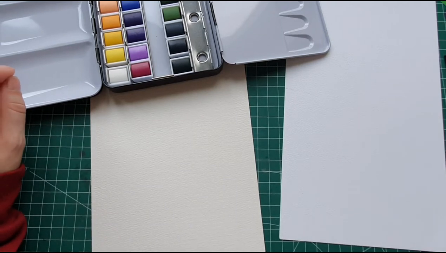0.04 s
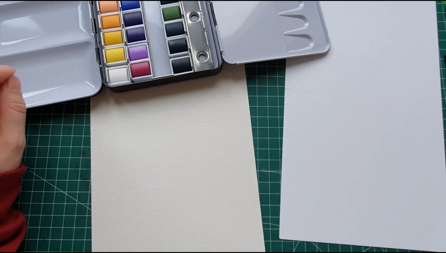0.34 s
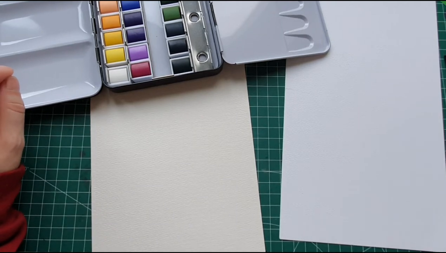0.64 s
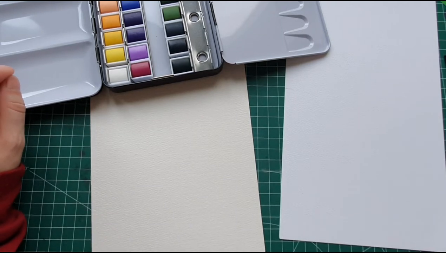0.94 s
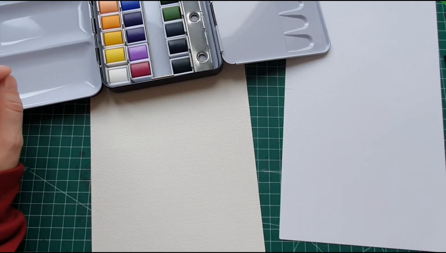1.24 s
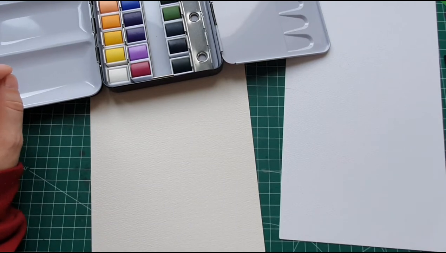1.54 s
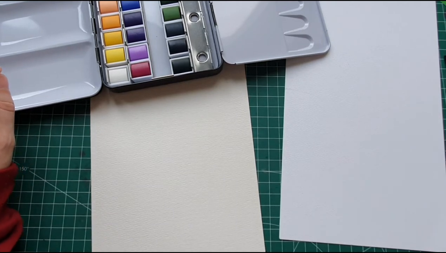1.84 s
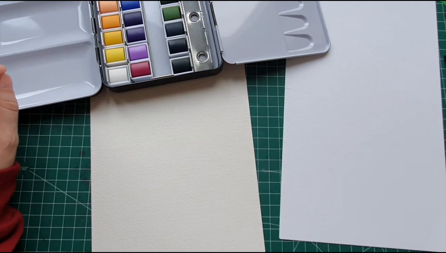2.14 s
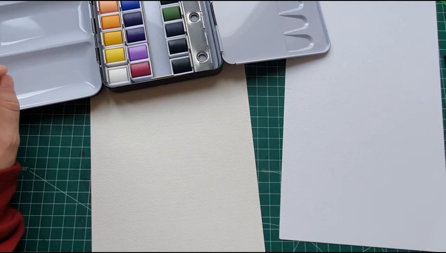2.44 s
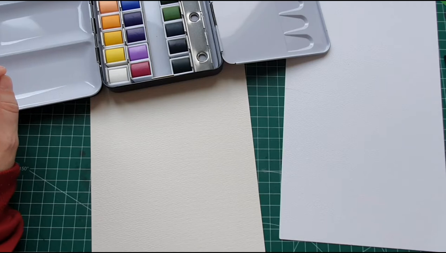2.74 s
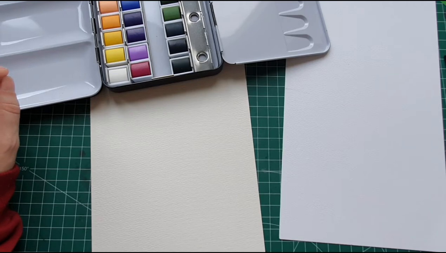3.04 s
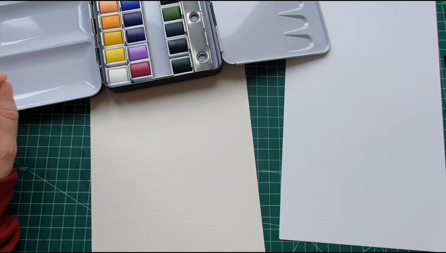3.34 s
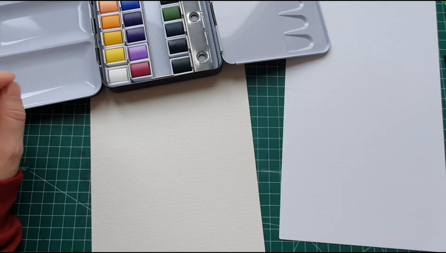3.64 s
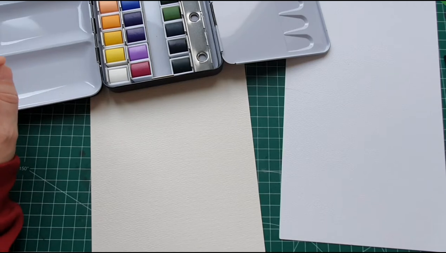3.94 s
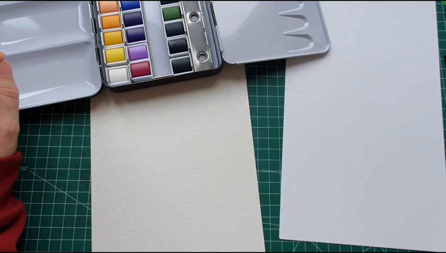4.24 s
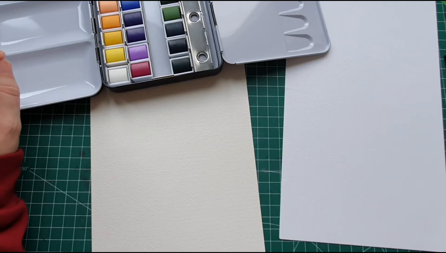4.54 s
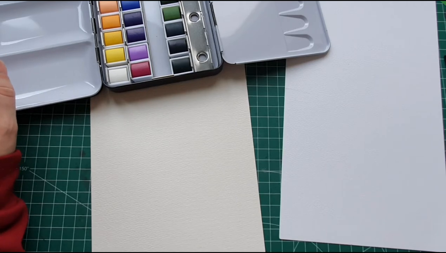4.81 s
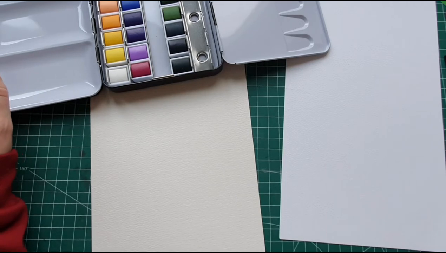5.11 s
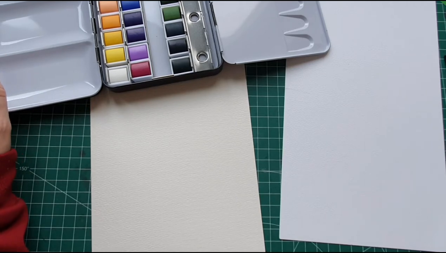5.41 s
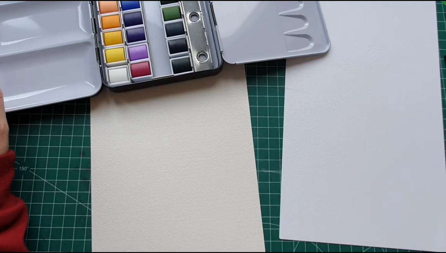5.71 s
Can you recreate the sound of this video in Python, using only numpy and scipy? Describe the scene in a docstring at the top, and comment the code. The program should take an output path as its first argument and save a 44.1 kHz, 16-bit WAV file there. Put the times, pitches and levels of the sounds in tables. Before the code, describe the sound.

Light, irregular clicks and rubs come from wooden paintbrushes being sorted on a tabletop, slightly to the right of the microphone. Sharper clusters of clacks follow, mixed with rustling bristles and dull bumps of the hand on the table, before the sounds ease into sparse, gentle ticks. Behind them the small room holds steady room tone and a faint engine-like hum that drifts in pitch.

```python
"""A small room, with a table to the right of a stereo microphone: a hand picks through wooden paintbrushes.
Handles knock on the tabletop, clack together and slide over one another; metal ferrules tick,
bristles hiss, and now and then the hand bumps the table softly. Underneath lie a low hum of
drifting pitch, like an engine far outside, a low resonance of the room and steady room tone."""
import sys
import numpy as np
from scipy import signal
from scipy.fft import rfft, irfft, next_fast_len
from scipy.io import wavfile
from scipy.ndimage import map_coordinates

SR = 44100
rng = np.random.default_rng(int(sys.argv[2]) if len(sys.argv) > 2 else 0)


def to_wav(sig):
    """Store sig (one row per channel, or 1-D mono) as 16-bit WAV at the path in sys.argv[1].

    Samples outside -1..1 are clipped; the rate is SR.
    """
    pcm = np.clip(np.atleast_2d(sig), -1, 1) * 32767
    pcm = np.round(pcm).astype(np.int16)
    wavfile.write(sys.argv[1], SR, pcm.T)  # frames by channels


N = 263321

# brush contacts: start_s, knock_db, clack_db, tick_db, knock_centre_hz, clack_centre_hz
CONTACTS = [(0.3649, -39, -45.5, -68, 390, 3340), (0.4982, -40, -48.5, -65.5, 390, 1330),
            (0.5184, -37.5, -56, -57.5, 406, 3070), (0.5432, -39.5, -41, -52, 600, 1450),
            (0.9283, -29.5, -37.5, -39, 470, 1960), (0.9437, -32, -46, -53.5, 390, 2930),
            (1.033, -34, -44.5, -58.5, 380, 1265), (1.2417, -38, -60, -58.5, 364, 1270),
            (1.4269, -42.5, -39, -53.5, 520, 1810), (1.44, -48, -39, -54.5, 527, 1810),
            (1.5313, -42, -52, -63.5, 407, 1546), (1.6375, -30, -44, -51.5, 365, 1690),
            (1.788, -35, -40.5, -59.5, 830, 1212), (1.7978, -36, -52, -67.5, 555, 1190),
            (2.0073, -47.5, -38.5, -52, 330, 2560), (2.1741, -27, -30.5, -53.5, 609, 1264),
            (2.191, -28, -33.5, -48.5, 450, 1355), (2.305, -36, -31, -36.5, 533, 4400),
            (2.39, -18.5, -23, -34, 603, 1300), (2.4383, -27, -19, -41.5, 477, 2600),
            (2.4546, -19.5, -24, -33, 459, 1950), (2.9872, -46.5, -29.5, -43, 619, 2806),
            (3.025, -29, -27.5, -45, 606, 2600), (3.0805, -36, -33, -44, 630, 2870),
            (3.1139, -43.5, -61, -50, 406, 1810), (3.1943, -50, -48, -52.5, 593, 2080),
            (3.346, -24.5, -23.5, -35, 605, 2660), (3.3654, -34, -31.5, -46, 621, 2790),
            (3.4422, -42.5, -35, -45.5, 605, 2130), (4.1094, -29, -26, -36, 730, 5000),
            (4.1204, -36.5, -29.5, -40.5, 615, 2724), (4.194, -30.5, -30.5, -47.5, 785, 2440),
            (4.2436, -37, -34, -49, 660, 3406), (4.3216, -39.5, -41, -54, 536, 2870),
            (5.2744, -39, -51.5, -72.5, 580, 1798), (5.3118, -42, -50, -59.5, 417, 1830),
            (5.3519, -42.5, -53, -63, 510, 1860), (5.6277, -38, -42, -42, 800, 1784),
            (5.8346, -42, -60, -63.5, 398.3, 1340), (5.874, -41, -51.5, -66, 412.4, 1260),
            (5.904, -50, -53, -55, 425, 1962), (5.9336, -36.5, -45.5, -50, 333, 1296)]
# light taps of one slim handle: start_s, level_db
SLIM_TAPS = [(4.8595, -52), (4.9213, -42.5), (4.9374, -44), (5.135, -57), (5.1675, -60), (5.2111, -46.5)]
# soft bumps on the table: start_s, peak_db, pitch_hz, t60_s
TABLE_BUMPS = [(0.934, -27.5, 232.5, 0.27), (1.782, -29.5, 118.5, 0.14), (1.989, -29, 62, 0.13),
               (2.302, -24, 202, 0.16), (2.39, -21, 251.6, 0.16), (2.456, -23.5, 116, 0.3),
               (2.459, -26, 186, 0.2), (3.237, -41.5, 108.3, 0.13), (3.319, -27, 100, 0.13),
               (3.937, -28, 227.6, 0.11), (4.113, -20, 151.4, 0.23), (4.182, -19, 189, 0.07),
               (4.198, -18, 82.4, 0.12), (4.86, -29.5, 217, 0.12), (5.283, -32.5, 163, 0.13),
               (5.507, -36.5, 253, 0.1)]
# strokes of the hand through the brushes: start_s, length_s, rub_db, scuff_db, hiss_db
HAND_STROKES = [(0.354, 0.076, -45, -47.5, -61), (0.503, 0.056, -44, -39.5, -57),
                (0.6, 0.14, -56, -46, -63.5), (0.792, 0.15, -53, -41.5, -61), (0.894, 0.056, -34, -36, -44),
                (0.97, 0.21, -74, -64, -72.5), (1.217, 0.095, -47.5, -45.5, -52),
                (1.292, 0.067, -44, -40.5, -60), (1.408, 0.061, -39, -42.5, -55),
                (1.45, 0.14, -53, -47.5, -62), (1.611, .06, -44, -49, -57.5),
                (1.719, 0.093, -40.5, -40.5, -50), (1.902, 0.21, -39, -42, -44),
                (2.066, .18, -32, -41, -39.5), (2.288, 0.075, -30, -30, -36),
                (2.432, 0.077, -30.5, -25, -47), (2.86, 0.08, -38, -45, -50), (2.995, .11, -35, -34, -51),
                (3.2, 0.25, -45.5, -54, -49.5), (3.32, 0.12, -39, -38, -48.5),
                (3.52, 0.38, -59.5, -87, -58), (3.734, 0.071, -52.5, -79, -54.5),
                (3.915, 0.069, -67, -52, -69.5), (4.06, 0.12, -52.5, -63, -53),
                (4.12, 0.094, -34, -33.5, -38), (4.201, .12, -31.5, -45, -43.5),
                (4.845, 0.1, -53, -53.5, -67), (5.136, 0.12, -52, -57, -62),
                (5.265, 0.096, -65, -50.5, -57), (5.411, 0.29, -81.5, -55.5, -79),
                (5.617, .04, -49, -48, -59), (5.878, 0.071, -48.5, -48, -53)]
# course of the distant engine: time_s, firing_hz, level_db
ENGINE_COURSE = [(0, 50.4, -45), (.42, 50.2, -39.5), (.8, 51.57, -45.5), (1, 51.86, -40),
                 (1.25, 53.07, -50), (2.35, 55.65, -40.5), (2.75, 55.5, -73), (3.25, 51.7, -42.5),
                 (3.52, 47.1, -44), (3.76, 44, -59), (3.95, 43.5, -43.5), (4.33, 47.16, -42),
                 (4.6, 49.9, -47), (4.92, 49.67, -41.5), (5.3, 51.4, -50), (5.6, 55.7, -43.5),
                 (5.97, 57.1, -47)]
# its harmonics as heard indoors: multiple, gain_db
ENGINE_HARMONICS = [(1, 2), (2, -6.5), (3, -7), (4, -15.5), (5, -26)]
# resonances of the struck bodies: centre_hz, width_hz, gain_db
TABLETOP_MODES = [(309, 140, -1.5), (392.3, 61, 1.5), (509, 120, -0.5), (574.5, 84, 3), (638, 40, 3.5),
                  (710.4, 17, 5.5), (907, 153, 3)]
HANDLE_MODES = [(1354, 160, 2.5), (1770, 110, -1), (1895, 120, 1.5), (2640, 250, 0.5), (3170, 1000, -2),
                (4030, 820, -1), (4570, 350, -4), (5500, 570, -8.5)]
FERRULE_MODES = [(6000, 680, 2.5), (8470, 1200, 3.5), (10200, 1400, 3), (11600, 1900, 0),
                 (14300, 4500, -11.5)]
SLIM_HANDLE_MODES = [(734, 139, -1.5), (1010, 200, -1.5), (1490, 160, 4), (1890, 100, 1), (2180, 100, -1),
                     (2910, 150, 2.5), (3570, 220, -2), (5590, 1800, -18)]
# spectra of the noisy sounds: frequency_hz, gain_db
CRACK_SPECTRUM = [(600, -5.5), (1900, -4.5), (4500, 5.5), (6000, -3.5), (12000, -21), (16000, -20)]
RUB_SPECTRUM = [(400, -36), (900, -1), (1400, 5), (2000, 4.5), (2700, 5.5), (4300, 3), (5500, -13.5),
                (7500, -30), (14000, -59.5)]
BRISTLE_SPECTRUM = [(2940, -27), (5000, 1.5), (7640, -6), (8580, -2), (10000, -6), (11800, -7.5),
                    (15200, -12), (16000, -41.5)]
ROOM_TONE_SPECTRUM = [(20, -19.5), (50, -10.5), (160, -14.5), (250, -24), (340, -28.5), (430, -40.5),
                      (1000, -44), (1400, -40), (2000, -52.5), (3300, -55), (7000, -64), (16000, -63)]
THUD_SPECTRUM = [(30, -18), (55, -10.5), (80, 8.5), (250, 2.5), (450, -27), (900, -18.5), (2000, -63.5)]
# reverberation of the room: frequency_hz, t60_s
ROOM_DECAY = [(100, 0.41), (500, 0.36), (3000, 0.31), (8000, 0.27), (15000, .22)]

TIME_S = np.arange(N) / SR
BLOW_S = np.arange(SR // 3) / SR  # time within one blow


def brush_contacts():
    """Right of the microphone, each contact knocks the tabletop and rings a handle and its ferrule."""
    out = np.zeros((2, N))
    for start_s, knock_db, clack_db, tick_db, knock_hz, clack_hz in CONTACTS:
        # the point of contact favours the resonances around one frequency
        knock = lambda hz: body(TABLETOP_MODES, hz) * resonance(hz, knock_hz, rel_width=0.22)
        clack = lambda hz: body(HANDLE_MODES, hz) * resonance(hz, clack_hz, rel_width=1.5)
        tick = lambda hz: body(FERRULE_MODES, hz)
        add(out, start_s, strike(knock, knock_db, chatter_s=0.013, snap=16, wet_db=-3, right_db=-0.5))
        add(out, start_s, strike(clack, clack_db, chatter_s=0.023, snap=2.8, wet_db=2, right_db=8))
        add(out, start_s, strike(tick, tick_db, chatter_s=0.055, snap=5.2, wet_db=3.5, right_db=19))
        add(out, start_s, crack(tick_db))
    return out


def crack(tick_db, hard_tick_db=-33.5, db_per_tick_db=4.1):
    """Hard blows open with a sharp crack, which grows faster than their ring."""
    burst = rng.standard_normal(len(BLOW_S)) * decay(t60_s=0.006)
    sound = in_room(filtered(burst, spectrum(CRACK_SPECTRUM)), wet_db=0.5, right_db=5)
    peak_db = -1.5 + db_per_tick_db * (tick_db - hard_tick_db)
    return amp(peak_db) * sound / np.abs(sound).max()


def slim_handle_taps():
    """A slim handle ticks on its own, hollow and clear of the tabletop."""
    out = np.zeros((2, N))
    handle = lambda hz: body(SLIM_HANDLE_MODES, hz)
    for start_s, level_db in SLIM_TAPS:
        add(out, start_s, strike(handle, level_db, chatter_s=0.015, snap=7.82, wet_db=-0.5, right_db=12))
    return out


def table_bumps():
    """The hand and the brush bundle push the table: a dull, quickly damped low note."""
    out = np.zeros((2, N))
    for start_s, peak_db, pitch_hz, t60_s in TABLE_BUMPS:
        thud = unit_rms(filtered(rng.standard_normal(len(BLOW_S)), spectrum(THUD_SPECTRUM)))
        note = np.sin(2 * np.pi * pitch_hz * BLOW_S)
        envelope = decay(t60_s) * (1 - np.exp(-BLOW_S / 0.0054))
        sound = in_room((note + 0.99 * thud) * envelope, wet_db=-6.5, right_db=4)
        add(out, start_s, amp(peak_db) * sound / np.abs(sound).max())
    return out


def sliding_brushes():
    """Handles rub together and scuff the tabletop while bristles hiss; strokes add in power."""
    power = np.zeros((3, N))
    for start_s, length_s, *levels_db in HAND_STROKES:
        power += np.outer(amp(levels_db) ** 2, hand_stroke(start_s, length_s) ** 2)
    rub_gain, scuff_gain, hiss_gain = np.sqrt(power)
    wood = lambda hz: amp(along(RUB_SPECTRUM, hz)) * (1 + 0.25 * body(HANDLE_MODES, hz))
    bristles = spectrum(BRISTLE_SPECTRUM)
    rub = friction(wood, catches_per_s=530, smooth=0.45, flutter_db=4, wet_db=9, right_db=2)
    hiss = friction(bristles, catches_per_s=300, smooth=0.41, flutter_db=1.5, wet_db=7, right_db=7.5)
    return rub_gain * rub + tabletop_scuff(scuff_gain) + hiss_gain * hiss


def hand_stroke(start_s, length_s, attack_share=0.39, release_db_per_s=272.5, settle_db_per_s=101):
    """A stroke's strength: the hand takes hold, pushes on, then leaves the brushes faintly settling."""
    t = TIME_S - start_s
    attack = np.sin(np.pi / 2 * np.clip(t / (attack_share * length_s), 0, 1)) ** 2
    after_s = np.maximum(t - length_s, 0)
    release = amp(-release_db_per_s * after_s)
    settling = amp(-17 - settle_db_per_s * after_s)
    return attack * np.maximum(release, settling)


def tabletop_scuff(strength, even_mix_db=-33):
    """Handles drag on the tabletop: light drags hum low, hard ones wake higher resonances."""
    low = lambda hz: body(TABLETOP_MODES, hz) * resonance(hz, 407, rel_width=0.32)
    high = lambda hz: body(TABLETOP_MODES, hz) * resonance(hz, 560, rel_width=0.6)
    light = friction(low, catches_per_s=170, smooth=0.7, flutter_db=1.5, wet_db=-4, right_db=4.5)
    hard = friction(high, catches_per_s=360, smooth=0.57, flutter_db=5.5, wet_db=-9.5, right_db=6.5)
    blend = np.arctan(strength / amp(even_mix_db))
    return strength * (np.cos(blend) * light + np.sin(blend) * hard)


def distant_engine():
    """Far outside: only the lowest firing harmonics pass the walls, each wavering on its own."""
    time_s, firing_hz, level_db = np.transpose(ENGINE_COURSE)
    phase = 2 * np.pi * np.cumsum(np.interp(TIME_S, time_s, firing_hz)) / SR
    hum = sum(amp(gain_db + 2.7 * wobble(11)) * np.sin(multiple * phase + 1.4 * wobble(17))
              for multiple, gain_db in ENGINE_HARMONICS)
    return amp(np.interp(TIME_S, time_s, level_db)) * hum * amp([[-0.4], [0.4]])


def room_boom():
    """Outside rumble keeps one low resonance of the room sounding."""
    room_mode = lambda hz: resonance(hz, 115.4, rel_width=0.044) ** 2
    return amp(-56.5) * unit_rms(filtered(rng.standard_normal(N), room_mode))


def room_tone():
    """Steady air at the microphone: rumble shared by both capsules, hiss unrelated between them."""
    air = spectrum(ROOM_TONE_SPECTRUM)
    mid_side = lambda hz: air(hz) * np.array([np.ones(len(hz)), hz / (hz + 300)])
    mid, side = filtered(rng.standard_normal((2, N)), mid_side)
    return amp(-53) * unit_rms(np.array([mid + side, mid - side]))


def strike(response, level_db, chatter_s, snap, wet_db, right_db):
    """An impulse (snap) and a chatter of micro-contacts ring a body; level_db is the first 30 ms rms."""
    force = rng.standard_normal(len(BLOW_S)) * decay(chatter_s)
    force[0] += snap
    sound = in_room(filtered(force, response), wet_db, right_db)
    onset = sound[:, :SR * 3 // 100]
    return amp(level_db) * sound / np.sqrt(np.mean(onset ** 2))


def friction(response, catches_per_s, smooth, flutter_db, wet_db, right_db):
    """Tiny catches of uneven size over smooth rubbing, heard in the room at rms 1."""
    catches = unit_rms(rng.laplace(size=N) * (rng.random(N) < catches_per_s / SR))
    force = (catches + smooth * rng.standard_normal(N)) * amp(flutter_db * wobble(60))
    return unit_rms(in_room(filtered(force, response), wet_db, right_db))


def body(modes, hz):
    """Response of a set of resonances that radiates little outside their range."""
    ring = sum((-1) ** k * amp(gain_db) * resonance(hz, centre_hz, width_hz / centre_hz)
               for k, (centre_hz, width_hz, gain_db) in enumerate(modes))
    radiation = signal.butter(2, [modes[0][0] * 0.19, modes[-1][0] * 11], "bandpass", analog=True)
    return ring * signal.freqs(*radiation, hz)[1]


def resonance(hz, centre_hz, rel_width):
    """One resonant peak; rel_width is its bandwidth over its centre frequency."""
    width_hz = centre_hz * rel_width
    return 1j * hz * width_hz / (centre_hz ** 2 - hz ** 2 + 1j * hz * width_hz)


def in_room(x, wet_db, right_db, left_lag_samples=19.5):
    """Direct sound meets the right capsule first, its treble right_db louder there; the room follows."""
    delay = lambda hz: np.array([np.exp(-2j * np.pi * hz * left_lag_samples / SR), np.ones(len(hz))])
    shade = lambda hz: amp(right_db * hz / (hz + 1200) * np.array([[-0.5], [0.5]]))
    direct = filtered(x, lambda hz: delay(hz) * shade(hz))
    return direct + amp(wet_db) * reverberation(x) * amp([[-0.6], [0.6]])


def reverberation(x):
    """The room's diffuse tail: the treble dies first, and the bass is alike at both capsules."""
    hz, t, noise = signal.stft(rng.standard_normal((2, SR // 3)), SR, nperseg=256)
    envelope = amp(-60 * t / along(ROOM_DECAY, hz)[:, None]) * (1 - np.exp(-t / 0.00057))
    tail = signal.istft(noise * envelope, SR, nperseg=256)[1]
    mid_side = lambda f: np.sqrt((1 + np.outer([1, -1], np.sinc(f / 1000))) / 2)
    mid, side = filtered(tail / np.linalg.norm(tail[0]), mid_side)
    return signal.fftconvolve(x[None], np.array([mid + side, mid - side]), axes=1)[:, :len(x)]


def amp(db):
    return 10 ** (np.asarray(db) / 20)


def unit_rms(x):
    return x / np.sqrt(np.mean(x ** 2) + 1e-20)


def decay(t60_s):
    return amp(-60 * BLOW_S / t60_s)


def along(points, hz):
    """Interpolate (frequency_hz, value) points on a log axis."""
    point_hz, values = np.transpose(points)
    return np.interp(np.log(hz + 1), np.log(point_hz + 1), values)


def spectrum(points):
    return lambda hz: amp(along(points, hz))


def wobble(knots_per_s):
    """A smooth random curve."""
    knots = rng.standard_normal(int(N * knots_per_s / SR) + 4)
    return map_coordinates(knots, [TIME_S * knots_per_s])


def filtered(x, response):
    """Pass x through a complex response, given as a function of frequency."""
    length = x.shape[-1]
    padded = next_fast_len(length + 4096)
    return irfft(rfft(x, padded) * response(np.fft.rfftfreq(padded, 1 / SR)), padded)[..., :length]


def add(track, start_s, sound):
    part = track[:, round(start_s * SR):][:, :sound.shape[1]]
    part += sound[:, :part.shape[1]]


def scene():
    """The table in front, the engine and the room behind it."""
    table = brush_contacts() + slim_handle_taps() + table_bumps() + sliding_brushes()
    return table + distant_engine() + room_boom() + room_tone()


def record(dry, low_cut_hz=34, top_hz=16300):
    """The microphone chain drops the deepest bass, clips at full scale and cuts the highest treble."""
    low_cut = signal.butter(4, low_cut_hz, "highpass", fs=SR, output="sos")
    clipped = np.clip(signal.sosfilt(low_cut, dry), -1, 1)
    return filtered(clipped, lambda hz: hz < top_hz)


dry = scene()
out = record(dry)
to_wav(out)
```